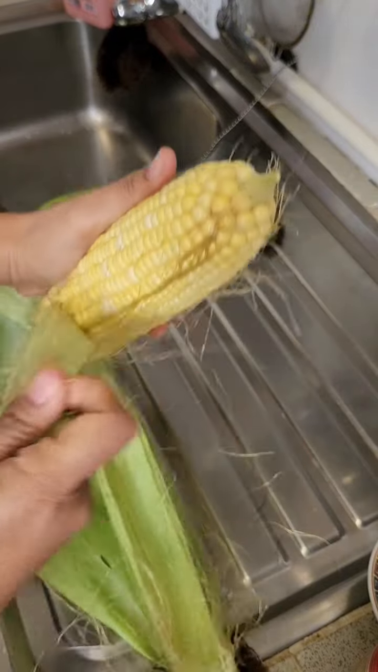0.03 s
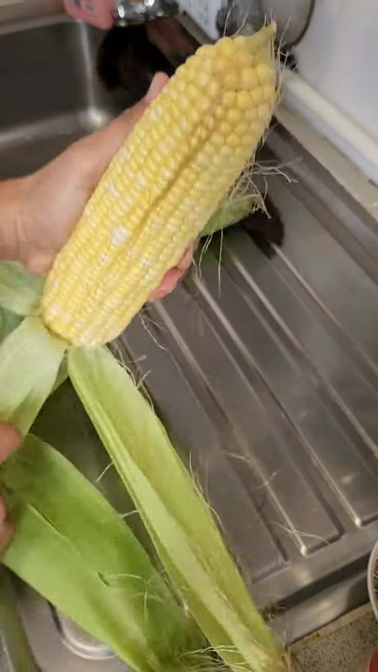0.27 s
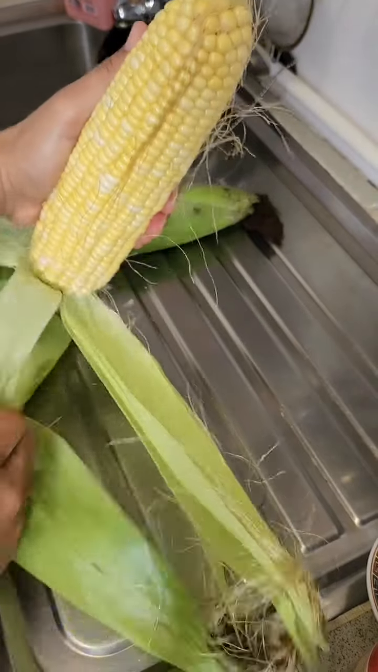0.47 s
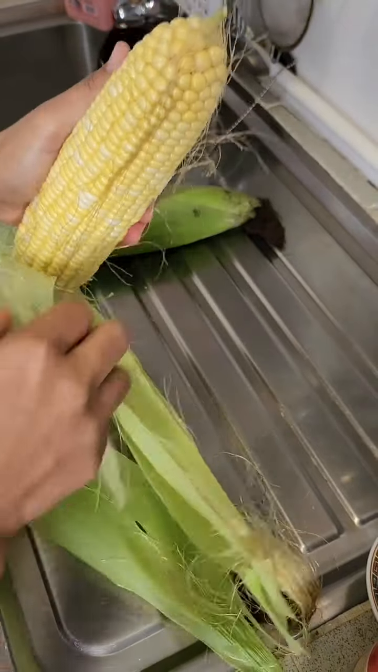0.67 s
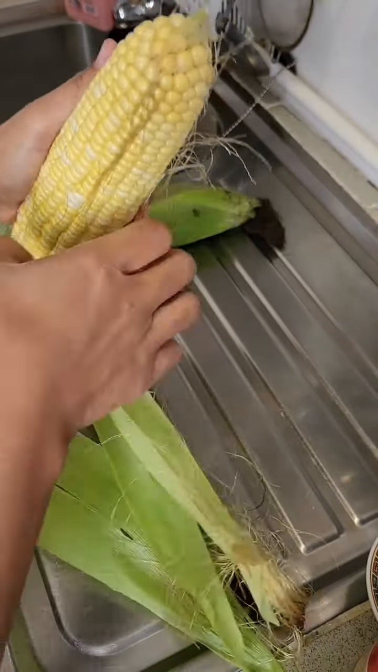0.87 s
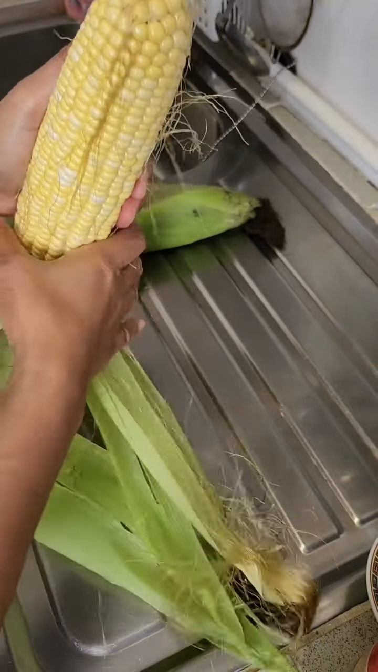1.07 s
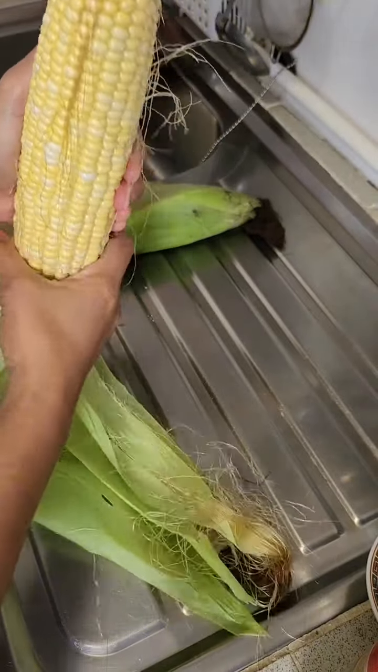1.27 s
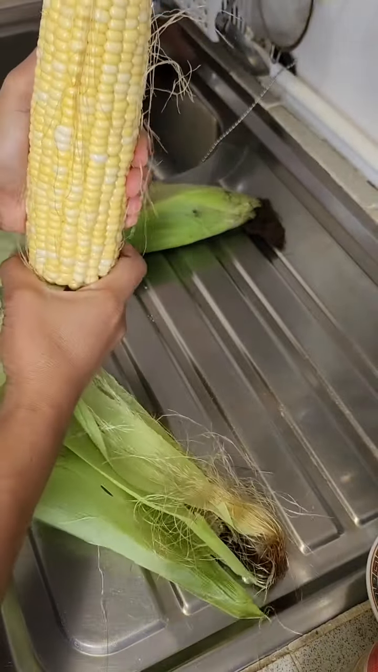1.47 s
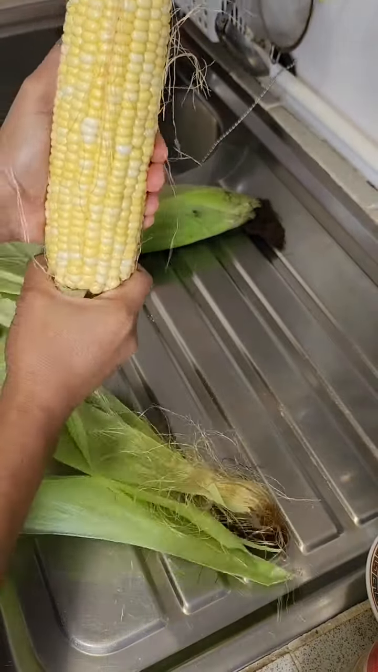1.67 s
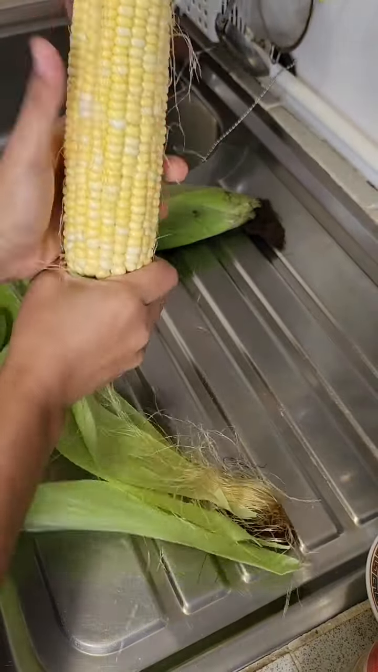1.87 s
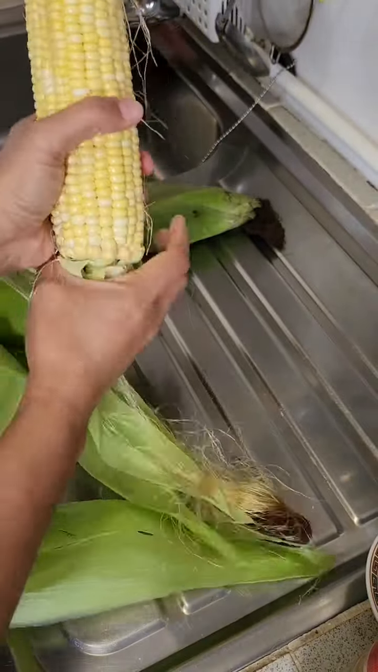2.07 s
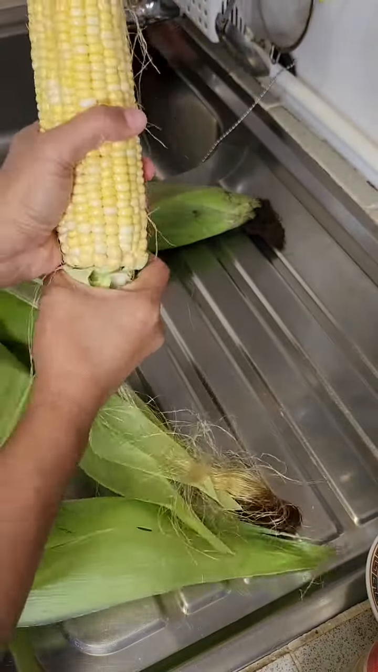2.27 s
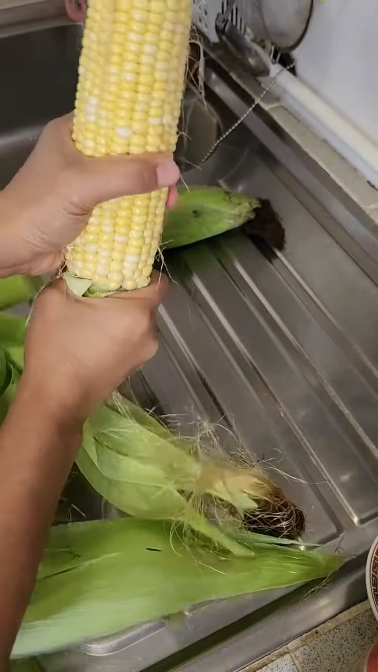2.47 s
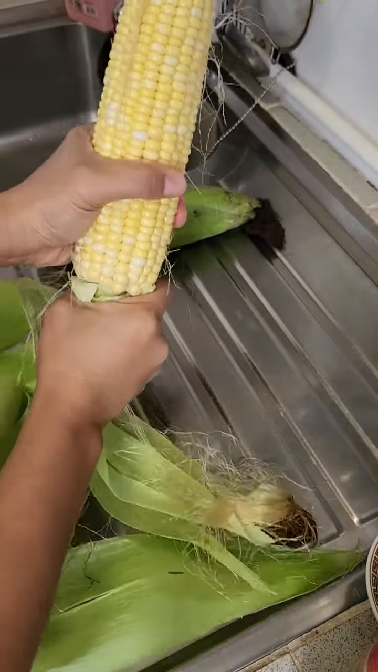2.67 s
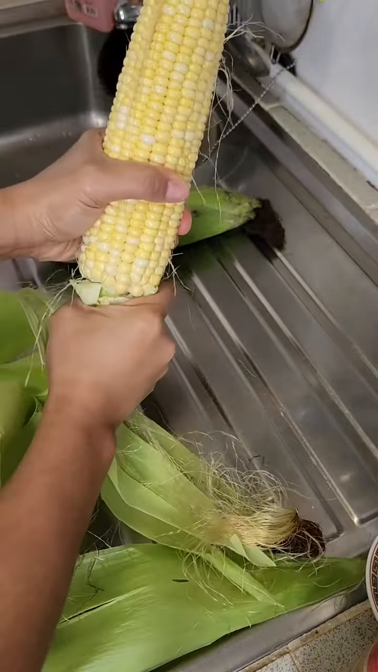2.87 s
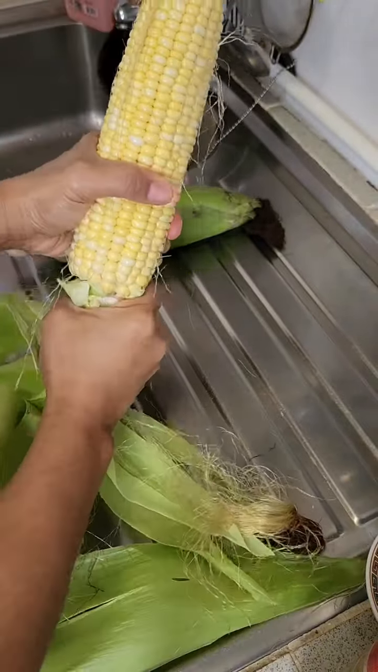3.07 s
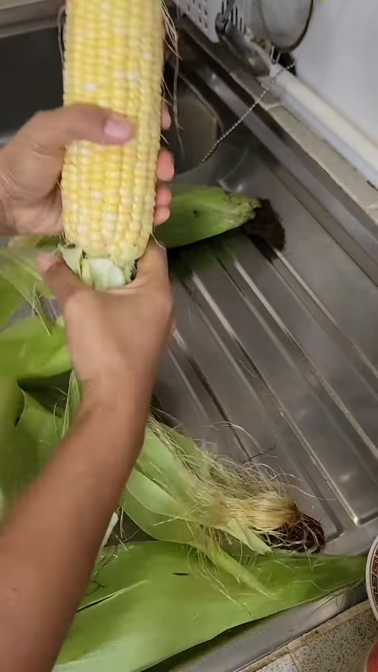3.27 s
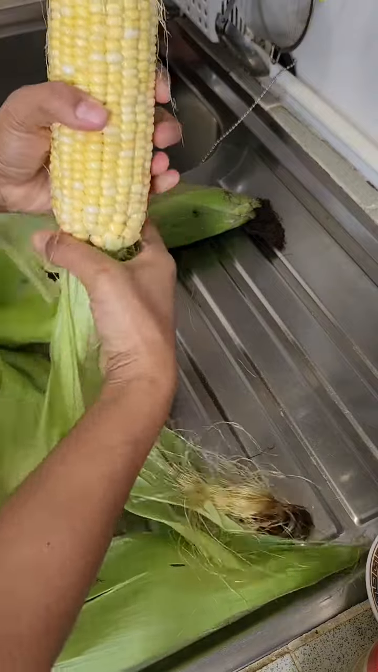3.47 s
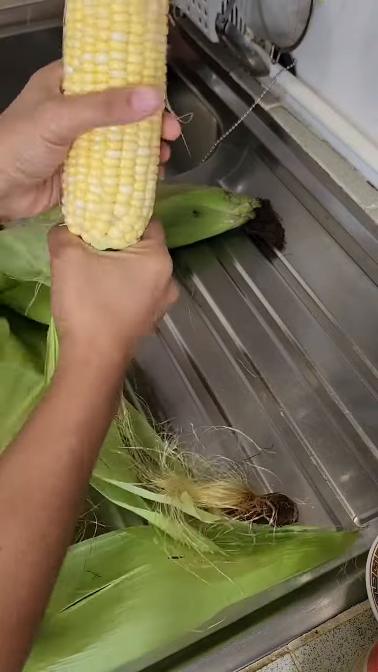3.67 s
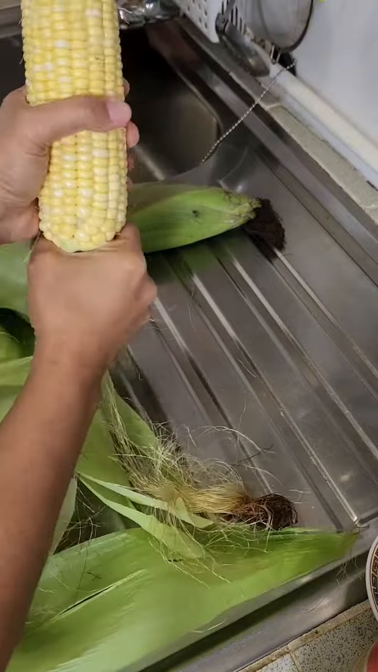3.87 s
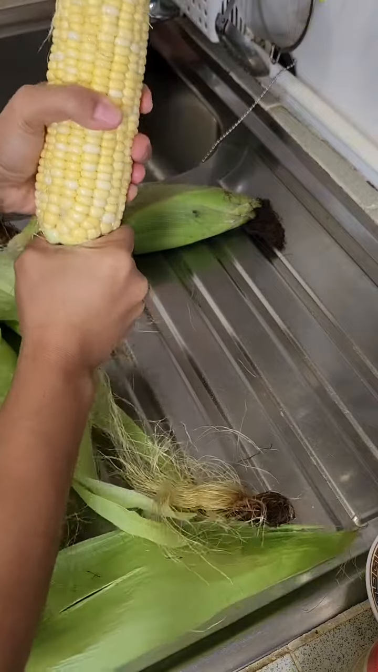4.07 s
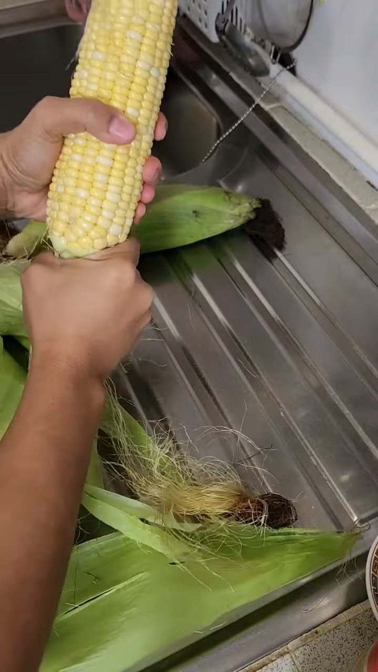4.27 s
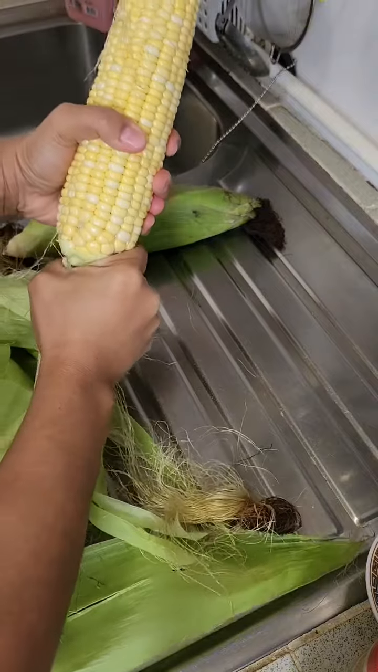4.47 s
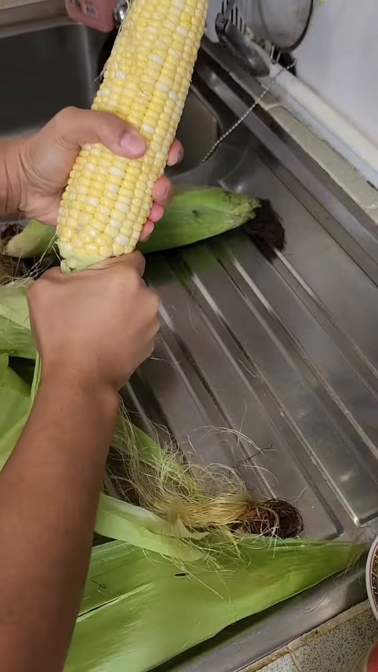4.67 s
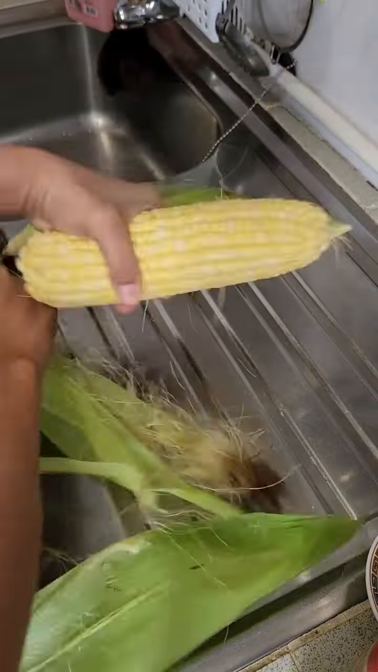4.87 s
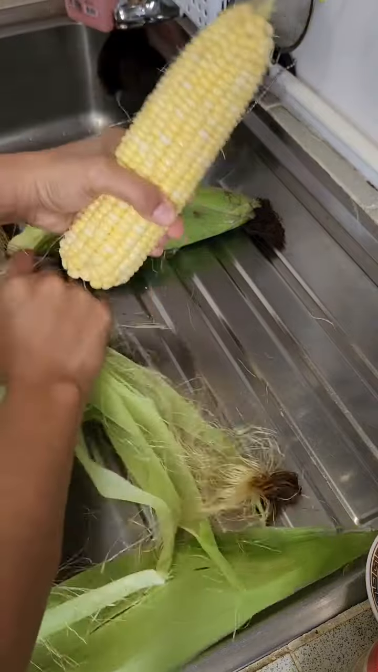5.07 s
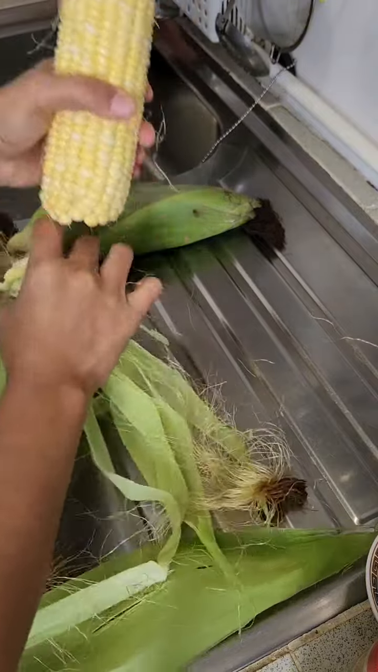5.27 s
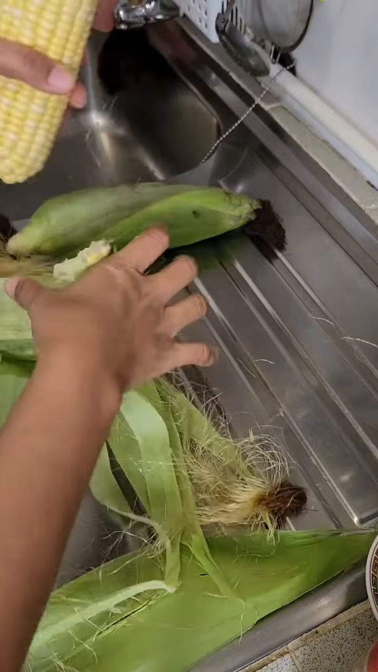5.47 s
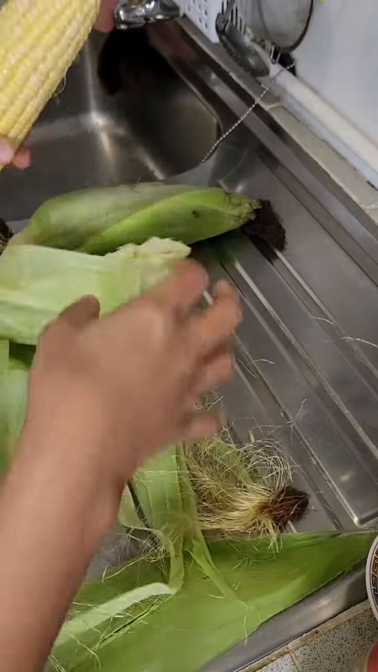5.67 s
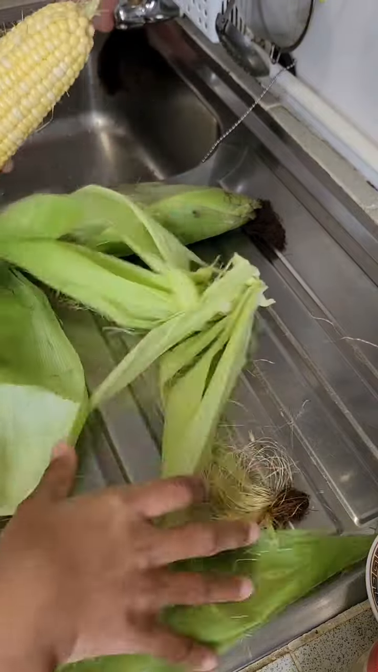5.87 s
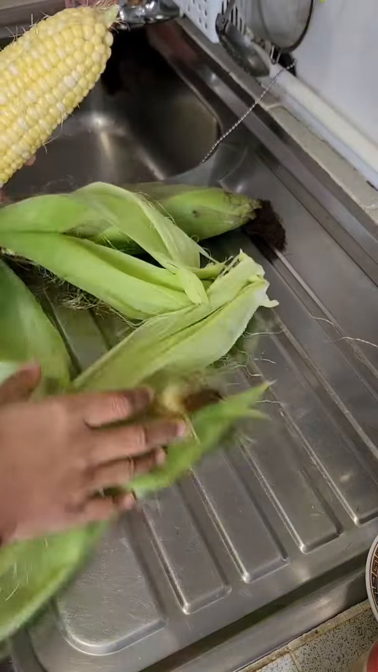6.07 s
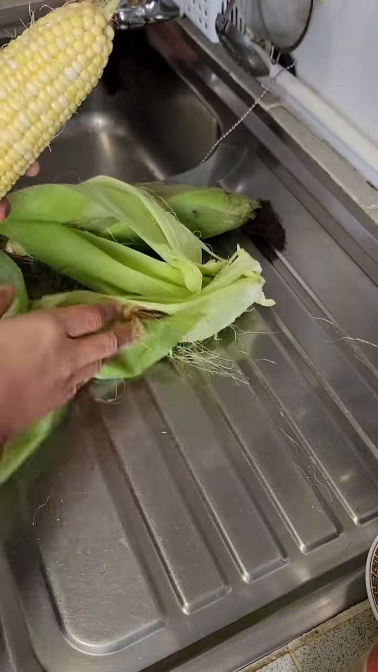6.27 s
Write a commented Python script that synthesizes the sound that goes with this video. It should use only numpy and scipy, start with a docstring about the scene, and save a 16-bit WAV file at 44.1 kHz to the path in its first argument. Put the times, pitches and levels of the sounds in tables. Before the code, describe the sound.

Close leafy rustling and fibrous tearing, a sharp stalk break, then a soft low boom as husks drop on a metal draining board.

```python
"""Fresh corn husks are twisted and torn by hand over a steel draining board in a small hard kitchen.
From the start a low resonant rumble and faint room tone hang behind leaves that crackle, hiss and creak.
Fibres snap in noise bursts that ring and die; soft thuds sound the low modes of the steel; leaf ribs tick.
Near 4.8 s the stalk breaks off with one crack; near 5.9 s the bunch drops and the steel booms.
The microphones stand close, with the hands off to the left and short echoes off steel and tiles."""
import sys
import numpy as np
from scipy import signal
from scipy.fft import rfft, irfft
from scipy.io import wavfile

SR = 44100
rng = np.random.default_rng(int(sys.argv[2]) if len(sys.argv) > 2 else 0)


def generate_wav(sig):
    """Save sig (samples, or channels by samples) to the path in sys.argv[1] as 16-bit PCM at SR."""
    pcm = np.round(np.clip(np.atleast_2d(sig).T, -1, 1) * 32767).astype(np.int16)
    wavfile.write(sys.argv[1], SR, pcm)


def boost_factor(decibels):
    """Convert a level in decibels to a linear amplitude factor."""
    exponent = np.asarray(decibels, float) / 20
    return 10 ** exponent


N = 278712


def rms_one(x):
    """Scales x to an rms of 1."""
    return x / np.sqrt(np.mean(x ** 2) + 1e-20)


def in_time(rows):
    """Draws each column after the time as a curve over the whole scene."""
    start_s, *columns = np.transpose(rows)
    return [np.interp(np.arange(N) / SR, start_s, column) for column in columns]


def at_hz(points, hz):
    """Reads a curve of (Hz, value) points along a logarithmic pitch axis."""
    point_hz, value = np.array(points)[:, 0], np.array(points)[:, 1]
    return np.interp(np.log(hz), np.log(point_hz), value)


def band(x, low_hz, high_hz):
    """Band-pass filter."""
    sos = signal.butter(2, [low_hz, high_hz], "band", fs=SR, output="sos")
    return signal.sosfilt(sos, x + 1e-18)


def coloured(x, spectrum):
    """Weights x by a spectrum of (Hz, dB) points."""
    hz = np.maximum(np.arange(N // 2 + 1) * SR / N, 1)
    return irfft(rfft(x) * boost_factor(at_hz(spectrum, hz)), N)


def resonance(x, hz, width_hz):
    """Two-pole resonance of gain 1 at its centre."""
    r = np.exp(-np.pi * width_hz / SR)
    feedback = [1, -2 * r * np.cos(2 * np.pi * hz / SR), r * r]
    return signal.lfilter([.5 - r * r / 2, 0, r * r / 2 - .5], feedback, x)


def noise_to_unit_rms(width_hz):
    """Gain that brings white noise of rms 1, once through a resonance, back to about rms 1."""
    return np.sqrt(SR / np.pi / width_hz)


def drift(rate_hz):
    """Slow chance wandering of rms 1: twice low-passed noise, drawn every 40 samples."""
    r = np.exp(-80 * np.pi * rate_hz / SR)
    white = rng.standard_normal(N // 40 + 2002)
    slow = signal.lfilter([1], [1, -2 * r, r * r], white)[2000:]   # skips the filter's start
    return np.interp(np.arange(N) / 40, np.arange(len(slow)), rms_one(slow))


def stereo_noise():
    """White noise, much alike at both microphones in the bass and almost unrelated in the treble."""
    # left-right correlation of the noise: pitch_hz, correlation (-1 to 1)
    correlation = [(60, 0.92), (290, 0.84), (900, 0.11), (3000, 0.06)]
    mid, side = rfft(rng.standard_normal((2, N)))
    hz = np.maximum(np.arange(len(mid)) * SR / N, 1)
    alike = np.clip(at_hz(correlation, hz), -1, 1)
    mid = np.sqrt(.5 + alike / 2) * mid
    side = np.sqrt(.5 - alike / 2) * side
    return irfft(mid + side * [[1], [-1]], N)


def rumble():
    """Noise through a few low resonances, each applied twice and wandering in level."""
    # level of the whole rumble: start_s, level_db
    rumble_level = [(0.0, -48.5), (5.0, -49.5), (5.49, -55), (6.32, -49)]
    # resonances of the room and the steel sheet: pitch_hz, width_hz (of one pass), relative_db
    rumble_modes = [(46.5, 6.9, -5.5), (65, 23, 0), (110.7, 16.6, -4.5), (184, 21, -9), (219.4, 14, -10.5),
                    (326.8, 37, -8), (363.2, 49, -8.5)]
    noise, out = stereo_noise(), 0
    for hz, width_hz, db in rumble_modes:
        once = resonance(noise, hz, width_hz)
        twice = resonance(once, hz, width_hz)
        out = out + boost_factor(db + 1.2 * drift(3.1)) * rms_one(twice)
    return rms_one(out) * boost_factor(in_time(rumble_level)[0])


def room_tone(level_db=-63):
    """Steady coloured noise: the air of the room."""
    # spectrum of the air: pitch_hz, density_db (relative, per Hz)
    air_spectrum = [(25, -3), (82, -0.5), (263, -18), (373, -12.5), (1050, -9), (1500, -28), (4000, -33),
                    (16000, -39.5)]
    return boost_factor(level_db) * rms_one(coloured(stereo_noise(), air_spectrum))


def rustle(crackles_per_s=1500.0, clumps_db=3.5, sharpness=3.8, patches=14):
    """Clumped crackles, each leaf patch at its own pitch, over a rubbing hiss; pressure adds a dull creak."""
    # leaves rubbing under the hands: start_s, rustle_db, extra_middle_db (relative to the rustle)
    rubbing = [(0, -61.5, -50), (.1, -47, 3), (.4, -51.5, -14), (.68, -65, -12), (.92, -70, -24),
               (.95, -61, -40), (1.55, -52, -4), (1.85, -60.5, -9), (2.2, -54.5, -8), (2.39, -41.5, -1.5),
               (2.7, -52.5, -39), (2.79, -57, -27), (3.17, -49.5, -18), (3.46, -62, -9), (3.55, -53.5, -10),
               (3.76, -54.5, -3), (3.93, -43.5, -4), (4.4, -60, -35), (4.72, -55, -24), (4.9, -53, -5),
               (5.56, -66.5, -4), (5.7, -63.5, 5), (6.0, -53, -15), (6.32, -52, -10)]
    # hands pressing the bunch, a dull creak: start_s, creak_db
    pressing = [(0, -55.5), (.5, -61.5), (1.2, -59), (1.55, -58), (2.0, -58), (2.39, -50), (2.8, -70),
                (3.5, -56.5), (3.72, -50), (3.86, -45), (4.1, -66), (4.75, -54.5), (5.0, -59), (6.0, -58.5),
                (6.32, -58.5)]
    # colour of the rubbed leaf: pitch_hz, weight_db
    leaf_colour = [(400, -5), (1500, 0), (5700, -4.5), (16000, -11)]
    sizes = boost_factor(4 * np.minimum(rng.exponential(1, (2, N)), 4)) * rng.choice([-1, 1], (2, N))
    luck, dealt = rng.random((2, N)), rng.integers(0, patches, (2, N))
    together, crackle = drift(25), 0   # the clumping that all patches share
    for patch, hz in enumerate(np.geomspace(500, 14000, patches)):
        chance = crackles_per_s * boost_factor(clumps_db * (together + drift(12))) / SR
        born = (dealt == patch) & (luck < chance)
        crackle = crackle + resonance(born * sizes + 1e-18, hz, hz / sharpness)
    hiss = boost_factor(1 + 2 * together) * rng.standard_normal((2, N))
    leaf = rms_one(crackle) + hiss
    leaf = leaf * boost_factor(1.5 * drift(12))   # the grip slips and catches
    rustle_db, middle_db = in_time(rubbing)
    rub = rms_one(coloured(leaf, leaf_colour)) + boost_factor(middle_db) * rms_one(band(leaf, 810, 2800))
    creak = rms_one(band(leaf, 170, 950)) * boost_factor(in_time(pressing)[0])
    return rub * boost_factor(rustle_db) + creak


def snaps(ring_db=-13, broad_db=-17, woody_db=-20, woody_sharpness=5.2, splinters_per_s=120.0, size=8000):
    """Each snap is a short crack, then a dying run of smaller fibre breaks; the freed leaf rings briefly."""
    # fibre and stalk snaps: start_s, strength_db (relative), pitch_hz, tear_s (to fall 40 dB), bright_db
    snap_events = [(0.057, -38, 4100, 0.029, 10), (0.095, -31, 5100, 0.2, 15.5),
                   (0.131, -24, 3800, 0.063, 5.5), (0.1708, -18.5, 5400, .069, 3.5),
                   (0.224, -26, 1210, 0.036, 1), (0.245, -28, 4970, .077, 9),
                   (0.2626, -22.5, 5760, 0.069, 7), (0.274, -28, 1320, 0.037, 5),
                   (0.3273, -28.5, 2440, 0.073, -11), (0.3506, -21, 2300, 0.016, 8.5),
                   (0.498, -38, 1290, 0.1, -3), (1.1276, -41, 5800, 0.17, 4), (1.22, -38.5, 4280, 0.11, 10),
                   (1.238, -22.5, 4700, 0.035, -0.5), (1.351, -42, 5400, 0.033, 25),
                   (1.3803, -27, 5900, 0.037, 10), (1.4575, -23, 5640, 0.032, 4.5),
                   (1.501, -25.5, 6200, 0.074, 1), (1.522, -31, 2490, 0.1, -2),
                   (1.542, -35, 2470, 0.18, -8), (1.578, -34.5, 4340, 0.092, 4),
                   (1.6845, -31.5, 5850, 0.029, 16), (1.77, -42.5, 3940, .094, 2),
                   (2.0447, -36.5, 1330, 0.17, -2), (2.224, -30.5, 2420, 0.065, 14),
                   (2.243, -29.5, 3940, 0.18, 8.5), (2.3133, -24, 1290, 0.11, 14),
                   (2.351, -25.5, 1990, 0.15, -0.5), (2.377, -24, 3930, 0.14, -6.5),
                   (2.438, -22, 5900, 0.062, -0.5), (2.5019, -16.5, 5200, 0.073, 1),
                   (2.4664, -25.5, 3450, 0.082, 9), (2.589, -35.5, 6900, 0.15, 0),
                   (2.627, -31, 1450, 0.17, 8), (2.6752, -13.5, 1600, 0.11, -0.5),
                   (2.7085, -17, 1380, 0.056, 6), (2.818, -25, 4440, 0.041, 2),
                   (2.857, -21, 1190, 0.09, 5.5), (2.8725, -20.5, 1240, 0.045, -1),
                   (2.9632, -22, 5200, 0.054, -1.5), (3.153, -32, 4340, 0.11, 4.5),
                   (3.204, -36.5, 2540, 0.36, 2.5), (3.493, -40, 1920, 0.4, -8),
                   (3.5354, -33.5, 1690, 0.14, 5.5), (3.63, -39, 2260, 0.12, 3),
                   (3.848, -32, 400, 0.23, -0.5), (3.8887, -29.5, 1460, 0.098, 4),
                   (3.92, -25.5, 1460, 0.081, -4.5), (3.952, -19.5, 1520, 0.033, 15.5),
                   (3.9903, -29.5, 1350, 0.038, -6.5), (4.048, -30, 4370, 0.13, 5),
                   (4.124, -32.5, 2700, 0.032, 10), (4.211, -43, 4630, 0.031, 19.5),
                   (4.294, -25.5, 3500, 0.059, 10.5), (4.3078, -21, 5270, 0.062, -3),
                   (4.5248, -30, 5260, 0.068, 7), (4.7712, -4, 2020, 0.068, 2.5),
                   (4.8068, -22.5, 1590, 0.15, -4.5), (4.851, -31, 1580, 0.21, 4.5),
                   (4.888, -33.5, 1760, 0.1, -5.5), (4.9333, -38.5, 2100, 0.048, -12),
                   (5.134, -45.5, 1390, 0.1, -12), (5.212, -43, 1950, .079, -8),
                   (5.311, -47.5, 1800, 0.15, -1), (5.4533, -49.5, 1930, 0.24, 1),
                   (5.868, -44, 2400, 0.24, 1.5), (5.94, -54, 3070, .1, 11)]
    # body, middle and edge of a snap: low_hz, high_hz
    snap_bands = [(420, 1465), (1200, 5980), (5500, 12980)]
    body_db, edge_db = -17.5, -21   # at brightness 0; a bright snap gains edge and loses body
    crack_db, crack_s, rise_s = 11, .0004, .0002
    t, count, blocks = np.arange(size) / SR, len(snap_events), size // 40
    white = rng.standard_normal((count, 2, size))
    grains = boost_factor(3 * np.repeat(rng.standard_normal((count, blocks)), 40, axis=1))
    thick = rng.random((count, blocks)) < splinters_per_s * 40 / SR   # now and then a thicker fibre
    grains = grains * boost_factor(5 * np.repeat(thick, 40, axis=1))
    parts, rings = np.zeros((3, 2, N + size)), np.zeros((2, N + size))
    for (start_s, strength_db, hz, tear_s, bright_db), noise, grain in zip(snap_events, white, grains):
        tear = grain * boost_factor(-40 * t / max(tear_s, .01))
        burst = boost_factor(strength_db) * noise * (boost_factor(crack_db) * np.exp(-t / crack_s) + tear)
        burst = burst * (1 - np.exp(-t / rise_s))   # fibres give way one after another
        at = round(start_s * SR)
        part_db = [body_db - bright_db, broad_db, edge_db + bright_db]
        parts[:, :, at:at + size] += boost_factor(part_db)[:, None, None] * burst
        wide_hz, woody_hz = hz / 1.5, hz / woody_sharpness
        woody = resonance(burst, hz, woody_hz) * noise_to_unit_rms(woody_hz)
        leaf_ring = resonance(burst, hz, wide_hz) * noise_to_unit_rms(wide_hz)
        rings[:, at:at + size] += boost_factor(woody_db - ring_db) * woody + leaf_ring
    out = boost_factor(ring_db) * rings[:, :N]
    for part, (low_hz, high_hz) in zip(parts, snap_bands):
        # the root evens out the loudness of narrow and wide bands
        out = out + band(part[:, :N], low_hz, high_hz) * np.sqrt(SR / 2 / (high_hz - low_hz))
    return out


def steel(stretch=2.5, settle_s=0.0072, rise_cycles=0.23, muffled_s=0.099, muffle_t60_s=0.082, size=20000):
    """A push rings the low modes; a strong one stretches the sheet, so the pitch starts high and sags."""
    # soft weights landing on the steel: start_s, push_db (relative)
    landings = [(0.5, -40), (1.547, -39), (2.049, -44), (3.761, -43), (3.856, -40), (4.775, -32),
                (4.81, -29.5), (5.874, -18.5)]
    # modes of the sheet: pitch_hz (once settled), relative_db, t60_s (before muffling)
    sheet_modes = [(108.7, -11.5, 0.87), (209.8, -4, 0.18), (354, -21.5, 0.24), (368, -13, 0.028)]
    t, out = np.arange(size) / SR, np.zeros(N + size)
    muffle_db = -60 * np.maximum(t - muffled_s, 0) / muffle_t60_s   # settling leaves damp the sheet
    for start_s, push_db in landings:
        tight_t = t + stretch * boost_factor(push_db) * settle_s * (1 - np.exp(-t / settle_s))
        at = round(start_s * SR)
        for k, (hz, db, t60_s) in enumerate(sheet_modes):
            rise = 1 - np.exp(-t * hz / rise_cycles)
            swell = rise * boost_factor(push_db + db - 60 * t / t60_s + muffle_db)
            out[at:at + size] += (-1) ** k * swell * np.sin(2 * np.pi * hz * tight_t)
    return out[:N]


def ticks(sharpness=7.3, size=4000):
    """Stiff leaf ribs tick and squeak: a brief dying scratch heard through one narrow resonance."""
    # ticks and squeaks: start_s, strength_db (relative), pitch_hz, t60_s (of the scratch)
    rib_ticks = [(2.054, -45, 1260, 0.019), (3.675, -48.5, 2330, 0.089), (3.681, -52, 1360, .08),
                 (4.938, -41.5, 2170, 0.093), (5.104, -42, 1470, 0.035), (5.315, -54.5, 1780, 0.036),
                 (5.666, -52, 1390, 0.043), (5.94, -40, 1260, 0.048), (6.028, -54, 1920, 0.034)]
    t, out = np.arange(size) / SR, np.zeros((2, N + size))
    white = rng.standard_normal((len(rib_ticks), size))
    for (start_s, strength_db, hz, t60_s), noise in zip(rib_ticks, white):
        at, width_hz = round(start_s * SR), hz / sharpness
        scratch = noise * boost_factor(strength_db - 60 * t / t60_s)
        out[:, at:at + size] += resonance(scratch, hz, width_hz) * noise_to_unit_rms(width_hz)
    return out[:, :N]


def kitchen(x, build_up_s=0.0013):
    """Dense echoes off steel and tiles: stereo noise that dies band by band."""
    # decay of the room: pitch_hz, t60_s
    room_decay = [(300, 0.076), (2500, 0.12), (14000, 0.14)]
    t = np.arange(SR // 2) / SR
    noise, tail = stereo_noise()[:, :len(t)], 0
    edges_hz = 100 * 2. ** np.arange(0, 7.6, 1.5)   # bands of an octave and a half
    for low_hz, high_hz in zip(edges_hz, edges_hz[1:]):
        t60_s = at_hz(room_decay, np.sqrt(low_hz * high_hz))
        tail = tail + band(noise, low_hz, high_hz) * boost_factor(-60 * t / t60_s)
    tail = tail * (1 - np.exp(-t / build_up_s))
    tail = tail / np.sqrt(np.sum(tail ** 2) / 2)   # mean energy of 1 per microphone
    return signal.fftconvolve(x, tail, axes=1)[:, :N]


def microphones(x, wide_above_hz=1000):
    """Close ports hear long waves alike; the hands are off to the left."""
    # how much louder the hands are on the left than on the right: pitch_hz, difference_db
    left_lead = [(250, -6.5), (700, 0.5), (4500, 4.5), (12000, 2)]
    mid, side = (x[0] + x[1]) / 2, (x[0] - x[1]) / 2
    side = signal.sosfilt(signal.butter(1, wide_above_hz, "high", fs=SR, output="sos"), side)
    half = np.array(left_lead) * [1, .5]   # half the difference goes to each side
    left = coloured(mid + side, half)
    right = coloured(mid - side, half * [1, -1])
    return np.stack([left, right])


def scene():
    """Husks with their echoes at the microphones, the steel, the rumble and the room tone."""
    husk = rustle() + snaps() + ticks()
    hands = microphones(husk + boost_factor(-11) * kitchen(husk))
    board = steel() * boost_factor([[.7], [-.7]])
    return hands + board + rumble() + room_tone()


def band_limit(x):
    """A steep low-pass at the top of the band."""
    return signal.sosfilt(signal.butter(12, 16820, fs=SR, output="sos"), x)


def record(dry):
    """The loudest peaks are rounded, then the top is cut."""
    rounded = 1.1 * np.tanh(dry / 1.1)
    top_cut = signal.cheby2(10, 22, 16000, fs=SR, output="sos")   # 22 dB down from 16 kHz up
    mix = signal.sosfilt(top_cut, rounded)
    return band_limit(mix)


dry = scene()
out = record(dry)
generate_wav(out)
```